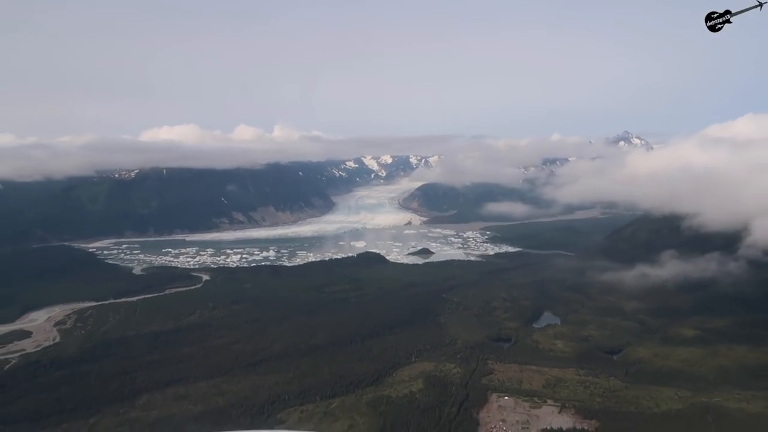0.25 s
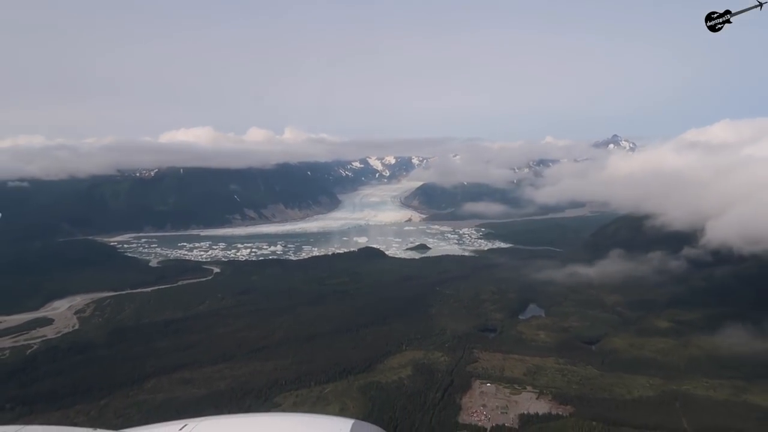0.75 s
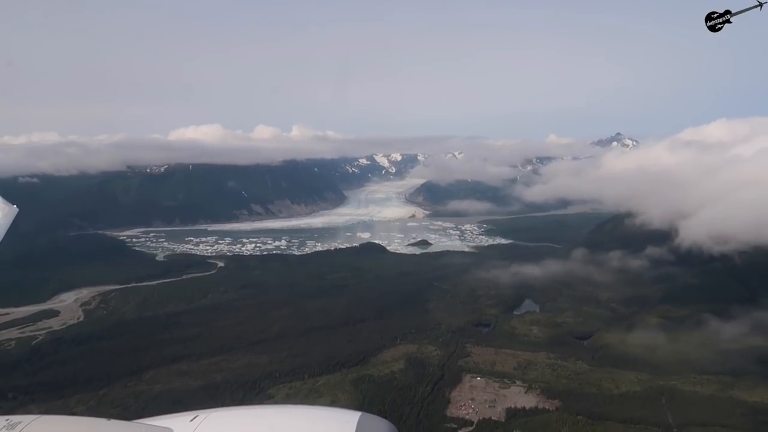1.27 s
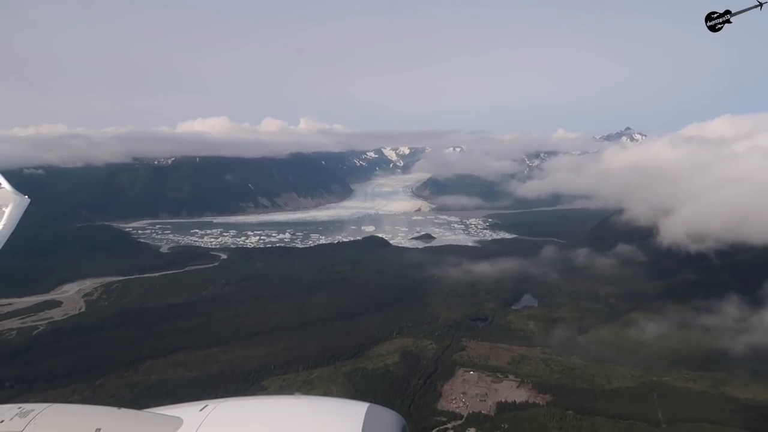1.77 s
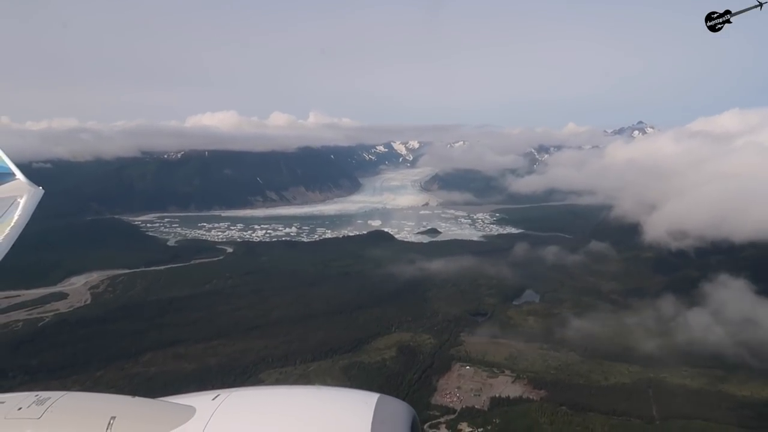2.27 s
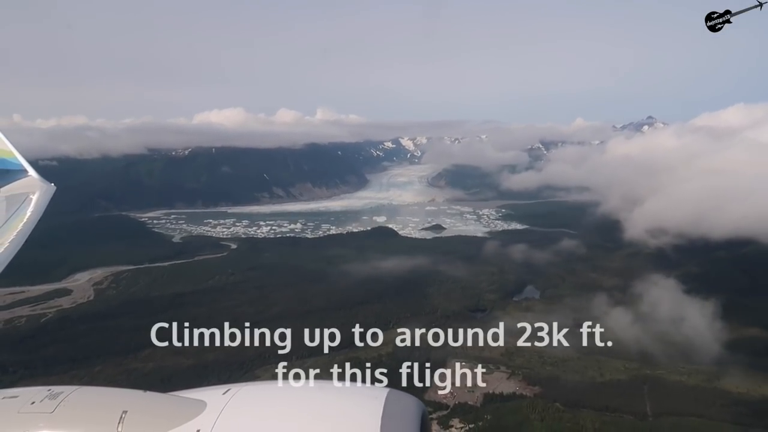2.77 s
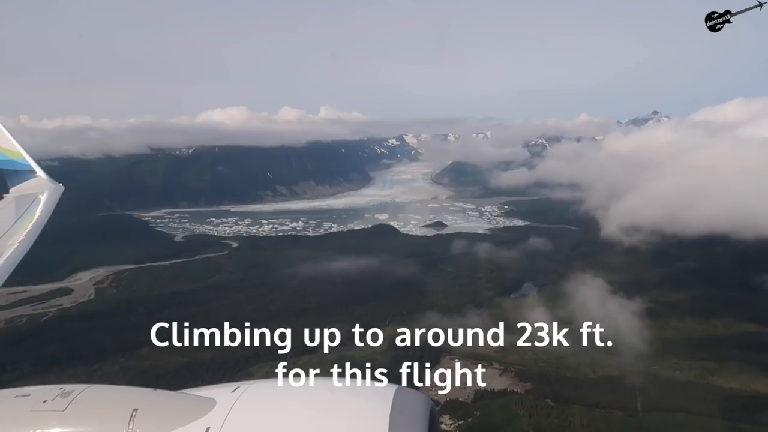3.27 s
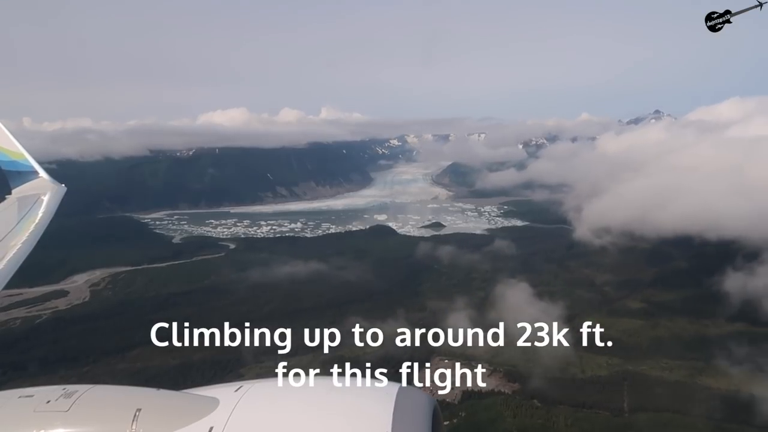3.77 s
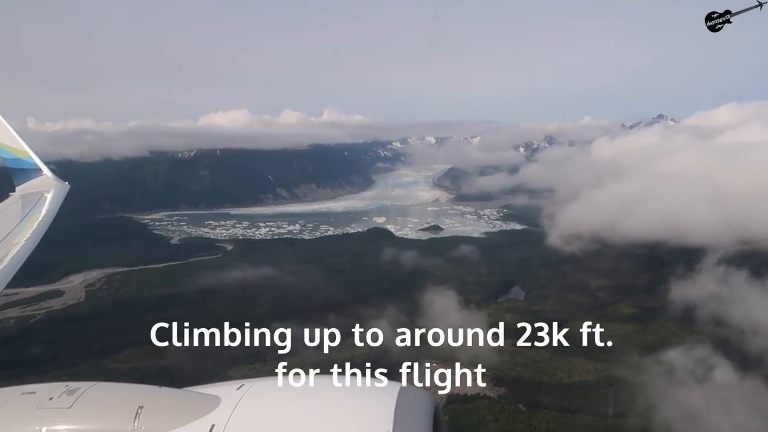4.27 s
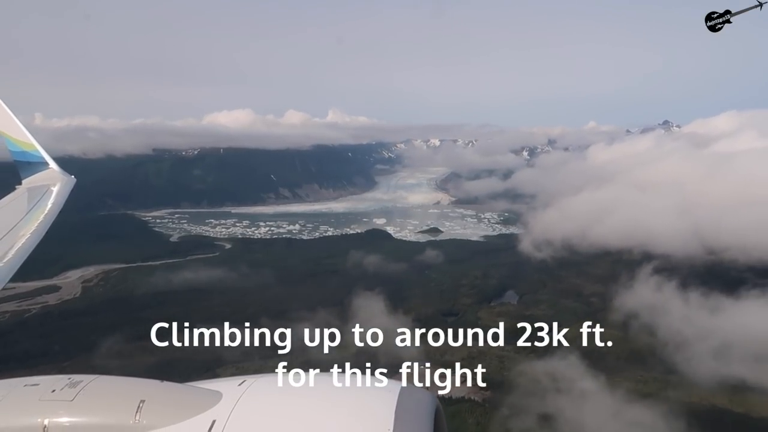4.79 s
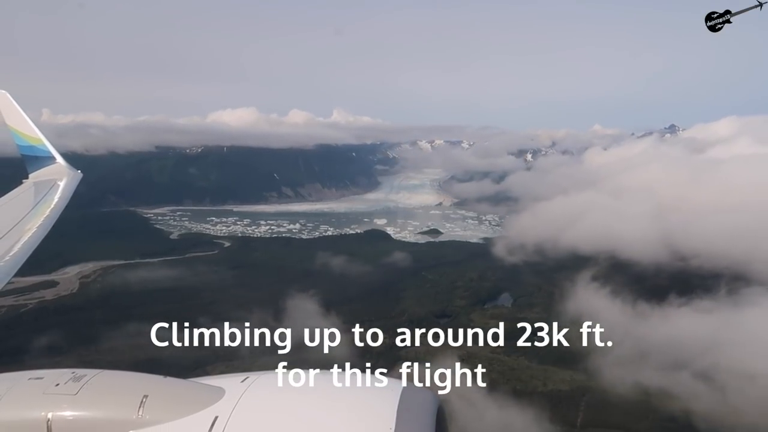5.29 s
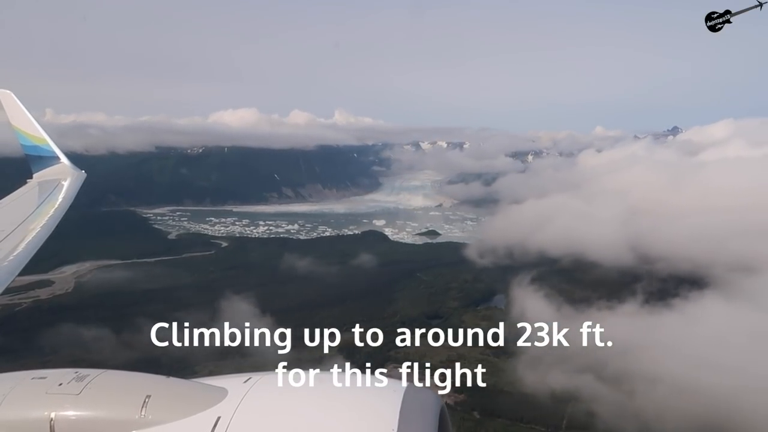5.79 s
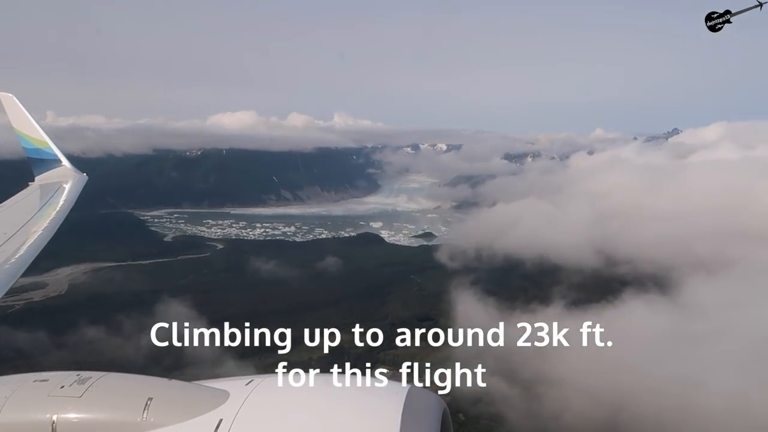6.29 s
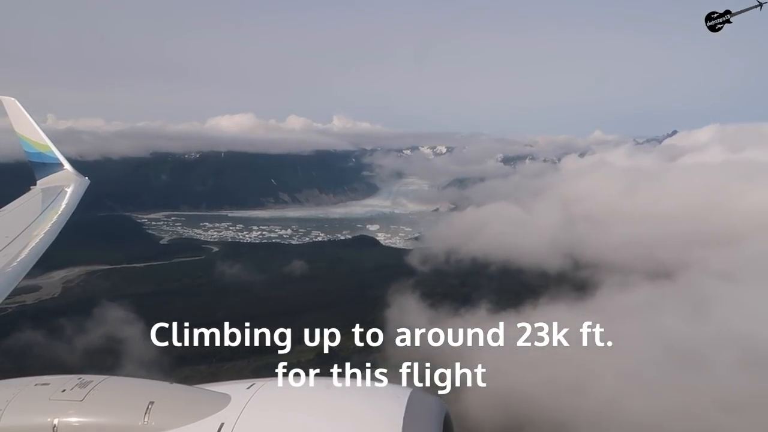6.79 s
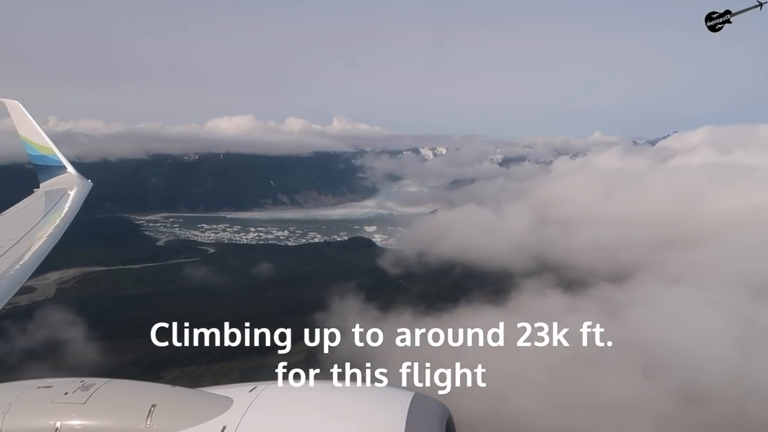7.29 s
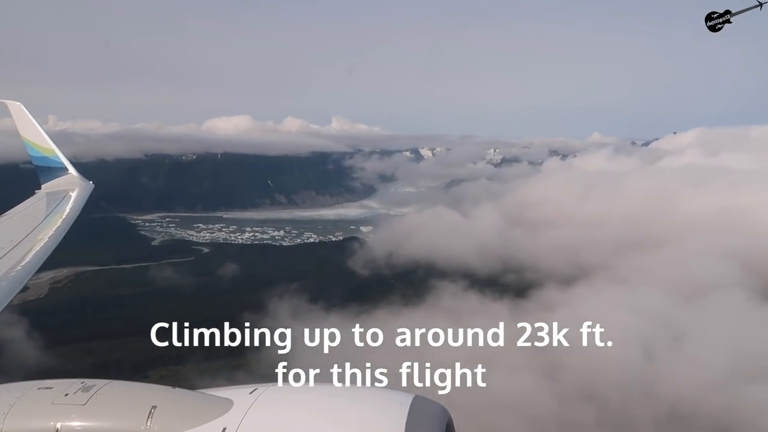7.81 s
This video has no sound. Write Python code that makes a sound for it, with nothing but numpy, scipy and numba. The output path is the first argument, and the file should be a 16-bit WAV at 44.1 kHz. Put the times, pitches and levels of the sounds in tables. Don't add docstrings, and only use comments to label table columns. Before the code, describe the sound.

Steady deep roar of jet engines and rushing air inside an airliner cabin, with a droning, slowly beating low hum and faint whines throughout.

```python
import sys
import numpy as np
from scipy import signal
from scipy.fft import rfft, irfft, next_fast_len
from scipy.io import wavfile
from scipy.ndimage import uniform_filter1d, minimum_filter1d
from numba import njit

SR = 44100
rng = np.random.default_rng(int(sys.argv[2]) if len(sys.argv) > 2 else 0)


def store_wav(level_fs):
    pcm = np.round(np.clip(np.atleast_2d(level_fs), -1, 1) * 32767)
    wavfile.write(sys.argv[1], SR, pcm.T.astype(np.int16))


def voltage_ratio(decibels):
    exponent = np.asarray(decibels, float) / 20
    return 10 ** exponent


N = 355005
STEP = 256


def columns(rows):
    return np.array(rows, dtype=float).T


def on_log(points, at):
    where, *values = columns(points)
    return [np.interp(np.log(at), np.log(where), v) for v in values]


def drift(rate_hz, count):
    r = np.exp(-2 * np.pi * rate_hz * STEP / SR)
    chance = rng.standard_normal((count, N // STEP + 1002))
    slow = signal.lfilter([1], [1, -2 * r, r * r], chance)[:, 1000:]
    slow -= slow.mean(axis=1, keepdims=True)
    return slow / slow.std()


# (time [s], near fan [rpm], lead of the far fan [rpm])
FAN_SPEEDS = [(0.0, 4660.41, 5.7), (0.35, 4660.99, 6.65), (1.05, 4664.54, 2.91), (1.75, 4665.29, 3.32),
              (2.45, 4664.78, 6.25), (3.15, 4667.92, 7.28), (3.5, 4669.22, 4.77), (4.2, 4669.8, 7.71),
              (4.9, 4674.85, 2.11), (5.6, 4673.0, 7.15), (6.3, 4675.97, 4.24), (6.65, 4675.84, 5.21),
              (8.05, 4677.4, 7.3)]


def fan_angles():
    s, near_rpm, lead_rpm = columns(FAN_SPEEDS)
    t = np.arange(N) / SR
    near_hz = np.interp(t, s, near_rpm) / 60
    far_hz = np.interp(t, s, near_rpm + lead_rpm) / 60
    return 2 * np.pi * np.cumsum(near_hz) / SR, 2 * np.pi * np.cumsum(far_hz) / SR


# (multiple of shaft speed, time [s])
BEAT_FADES = [(1, -1.2), (17, 3.574), (18, 3.543), (19, 3.7), (21, 3.882), (22, 3.972), (24, 3.693),
              (25, 3.546), (27, 3.865), (28, 3.844), (31, 3.734), (32, 3.745), (33, 3.65), (42, 3.689),
              (47, 3.582), (48, 3.685), (51, 3.5)]


def fan_phases(near, far):
    near_phases, far_phases = 2 * np.pi * rng.random((2, 150))
    lead = far - near
    for order, fade_s in BEAT_FADES:
        lead_then = lead[round(fade_s * SR)] if fade_s > 0 else lead[0] * SR * fade_s
        far_phases[order - 1] = near_phases[order - 1] - order * lead_then + np.pi
    return near_phases, far_phases


@njit
def stack(angle, mid, side, step):
    out = np.zeros((2, len(angle)))
    for n in range(len(angle)):
        block, part = n // step, (n % step) / step
        turn = np.exp(1j * angle[n])
        power = turn
        for k in range(mid.shape[1]):
            mid_height = mid[block, k] + part * (mid[block + 1, k] - mid[block, k])
            side_height = side[block, k] + part * (side[block + 1, k] - side[block, k])
            out[0, n] += (power * mid_height).real
            out[1, n] += (power * side_height).real
            power *= turn
    return out


# (multiple of shaft speed, mid level [dB rms], side level [dB rms])
WEAK_ORDERS = [(2, -44, -90), (7, -60, -88), (15, -61, -88), (25, -69, -84), (35, -75, -86), (45, -77, -94),
               (55, -85, -88), (65, -89, -89), (85, -94, -96), (105, -101, -99), (124, -102, -100),
               (150, -125, -105)]


def buzz(angle, clear, phases):
    count = len(phases)
    orders = np.arange(1, count + 1)
    mid_db, side_db = on_log(WEAK_ORDERS, orders) + 3.0 * rng.standard_normal((2, count))
    for order, level_db, lean_db in clear:
        mid_db[round(order) - 1] = level_db
        side_db[round(order) - 1] = level_db + lean_db
    hz = orders * angle[-1] / (2 * np.pi * N / SR)
    wander_db = 2.0 * np.minimum(hz / 3000, 1)[:, None] ** 2
    shared_db = 0.6 * flow_shares(hz).T @ flow_db(STEP)[:, :N // STEP + 2]
    mid = voltage_ratio(mid_db[:, None] + shared_db + wander_db * drift(0.31, count))
    side = voltage_ratio(side_db[:, None] + shared_db + wander_db * drift(0.25, count))
    side_phases = 2 * np.pi * rng.random(count)
    mid_heights = np.sqrt(2) * (mid * np.exp(1j * phases)[:, None]).T.copy()
    side_heights = np.sqrt(2) * (side * np.exp(1j * side_phases)[:, None]).T.copy()
    return stack(angle, mid_heights, side_heights, STEP)


# (multiple of shaft
# speed, level [dB rms], side re mid [dB])
NEAR_BUZZ = [(1, -22, -75), (2, -33, -50), (3, -28.5, -40), (5, -34, -40), (6, -43, -40), (8, -44, -40),
             (11, -47, -24), (16, -56, -30), (17, -58, -40), (18, -57, -23), (19, -56, -20), (21, -61, -16),
             (24, -48, -12), (25, -55, -29), (29, -63, -11), (30, -61, -6), (31, -66, -9), (32, -67, -3),
             (33, -61, -20), (37, -66, -22), (38, -61, -18), (39, -67, -20), (41, -68, -25), (42, -69, -23),
             (45, -68, -26), (47, -69, -30), (48, -68, -22), (49, -72, -20), (51, -71, -16), (52, -70, -20),
             (56, -80, -6), (58, -76, -13), (63, -82, 0), (65, -82, 1), (70, -81, -8), (81, -82, -14),
              (83, -86, -3)]
FAR_BUZZ = [(1, -31, -75), (4, -38, -38), (17, -63, -26), (18, -59, -22), (19, -58, -18), (21, -61, -20),
            (22, -63, -20), (24, -49, -9), (25, -60, -15), (27, -58, -23), (28, -68, -17), (29, -64, -12),
            (31, -70, -24), (32, -66, -8), (33, -64, -15), (35, -76, -13), (36, -67, -12), (40, -72, -25),
            (41, -69, -27), (42, -74, -22), (43, -75, -27), (46, -68, -22), (47, -75, -24), (48, -64, -26),
            (50, -72, -15), (51, -72, -8), (52, -80, -13), (53, -80, -9), (54, -81, -5), (57, -74, 1),
            (65, -84, -8), (71, -82, -2), (72, -84, -4), (116, -89, -12)]


def engines():
    near, far = fan_angles()
    near_phases, far_phases = fan_phases(near, far)
    out = buzz(near, NEAR_BUZZ, near_phases)
    out += buzz(far, FAR_BUZZ, far_phases)
    out[0] += core_shaft(near, near_phases) + gears(near, near_phases)
    return out


def opposite_phase(near, near_phases, order, fade_s):
    return order * near[round(fade_s * SR)] + near_phases[order - 1] + np.pi


def core_shaft(near, near_phases):
    core_hz, fade_s, level_db = 232.23, 1.0, -27
    since = np.arange(N) / SR - fade_s
    angle = 2 * np.pi * core_hz * since + opposite_phase(near, near_phases, 3, fade_s)
    return np.sqrt(2) * voltage_ratio(level_db) * np.cos(angle)


def gears(near, near_phases):
    gear_hz, gear_fade_s, gear_db = 1472.95, 4.533, -51
    twin_hz, twin_fade_s, twin_db = 1476.73, 4.71, -54
    t = np.arange(N) / SR
    gear = 2 * np.pi * gear_hz * (t - gear_fade_s) + opposite_phase(near, near_phases, 19, gear_fade_s)
    twin = gear + 2 * np.pi * (twin_hz - gear_hz) * (t - twin_fade_s) + np.pi
    swell = np.sqrt(2) * voltage_ratio(1.1 * flow_db(step=1)[1, :N])
    return swell * (voltage_ratio(gear_db) * np.cos(gear) + voltage_ratio(twin_db) * np.cos(twin))


# (frequency [Hz], level [dB rms], side re mid [dB])
PUMP_WHINES = [
    (246.1, -37, -36),
    (536.3, -47, -29),
    (1072.6, -67, -18),
    (1608.9, -64, -28),
    (1704.7, -72, -16),
    (2145.2, -68, -17),
]


def pumps():
    out, t = np.zeros((2, N)), np.arange(N)
    for (hz, level_db, lean_db), slow in zip(PUMP_WHINES, drift(0.56, len(PUMP_WHINES))):
        swell_db = 4.5 * np.interp(t / STEP, np.arange(len(slow)), slow)
        height = np.sqrt(2) * voltage_ratio(level_db + swell_db)
        start = 2 * np.pi * rng.random((2, 1))
        out += height * voltage_ratio(np.array([[0], [lean_db]])) * np.cos(2 * np.pi * hz * t / SR + start)
    return out


# (time [s], level [dB])
LEVEL_SWINGS = [(0.0, -0.5), (0.44, -0.6), (0.6, -2.5), (0.84, 1.3), (1.32, -3), (1.96, -0.4), (2.6, -1.2),
                (2.92, 0.1), (3.64, 1), (3.72, -0.1), (4.52, 3), (4.84, -1.1), (5.96, 3), (6.08, -1), (6.4, 1.5),
                (6.72, -1.8), (6.96, 3), (8.04, -2.5)]
SWING_SHARES = [
    0.6,
    1.01,
    1.02,
]


def flow_db(step):
    t = np.arange(0, N + 2 * step, step) / SR
    rows = np.outer(SWING_SHARES, np.interp(t, *columns(LEVEL_SWINGS)))
    rows[2] += 0.05 * t
    return rows - rows.mean(axis=1, keepdims=True)


FLOW_CENTRES = [
    150,
    600,
    5000,
]


def flow_shares(hz):
    return np.array([np.interp(np.log(hz), np.log(FLOW_CENTRES), row) for row in np.eye(3)])


# (frequency [Hz], density [dB per Hz])
ROAR_MID = [(30, -56), (55, -42), (125, -35.5), (190, -41), (1050, -69.5), (1300, -75), (1700, -79),
            (2100, -78.5), (2600, -89.5), (3700, -89), (4400, -101), (9400, -112), (10200, -117),
            (11700, -116)]
# (frequency [Hz], density [dB per Hz])
ROAR_SIDE = [(60, -110), (200, -85.5), (500, -92), (900, -93.5), (1200, -97.5), (1900, -86), (2500, -92.5),
             (3300, -104), (4200, -101), (7000, -107), (11800, -111), (13000, -116), (14300, -125)]
# (frequency [Hz], width [Hz], gain [dB])
WALL_PANELS = [
    (142, 13, 1.5),
    (324, 120, 3),
    (637, 100, 4.5),
    (1040, 160, 5.5),
    (1484, 99, 5),
]


def roar():
    size = next_fast_len(N)
    hz = np.maximum(np.arange(size // 2 + 1) * SR / size, 1)
    colour = voltage_ratio(np.array(on_log(ROAR_MID, hz) + on_log(ROAR_SIDE, hz))) * np.sqrt(SR / 2)
    colour *= np.minimum(hz / 25, 1) ** 2
    colour[0, hz > 11700] = 0
    panel_db = sum(gain_db / (1 + (2 * (hz - top_hz) / width) ** 2) for top_hz, width, gain_db in WALL_PANELS)
    colour *= voltage_ratio(panel_db)
    noise = rfft(rng.standard_normal((2, size))) * colour
    regions = [irfft(noise * share, size)[:, :N] for share in flow_shares(hz)]
    levels_db = flow_db(step=0.99)
    return sum(voltage_ratio(level_db[:N]) * region for level_db, region in zip(levels_db, regions))


def scene():
    mid, side = voltage_ratio(0.25) * engines() + pumps() + roar()
    lag_samples, lag_band_hz = 1.1, [135, 1500]
    long_waves = signal.sosfiltfilt(signal.butter(2, lag_band_hz, "band", fs=SR, output="sos"), mid)
    side = side - lag_samples / 2 * np.gradient(long_waves)
    shivers = drift(9.0, count=1)[0]
    flutter_db = 0.82 * np.interp(np.arange(N) / STEP, np.arange(N // STEP + 2), shivers)
    return voltage_ratio(flutter_db) * np.array([mid + side, mid - side])


def top_cut(x):
    return signal.sosfilt(signal.butter(12, 14400, fs=SR, output="sos"), x)


def record(dry):
    peak_db = 20 * np.log10(np.abs(dry).max(axis=0) + 1e-9)
    over_db = np.minimum(-6.0 - peak_db, 0)
    gain_db = uniform_filter1d(minimum_filter1d(0.5 * over_db, size=441), size=441)
    soft_start = np.minimum(np.arange(N) / 150, 1)
    return top_cut(dry * voltage_ratio(gain_db) * soft_start)


dry = scene()
out = record(dry)
store_wav(out)
```